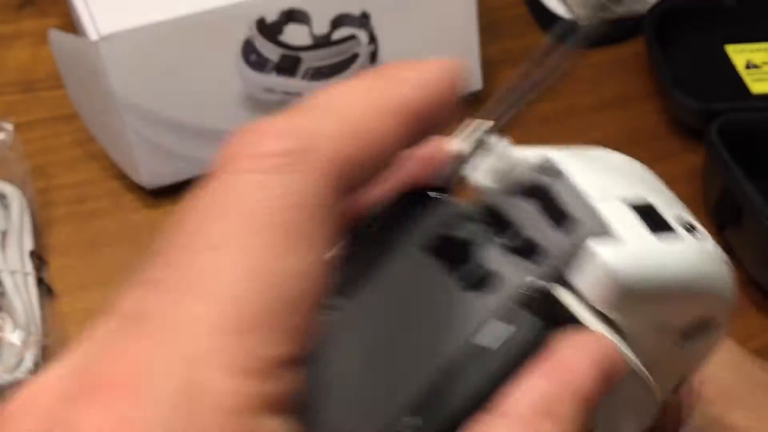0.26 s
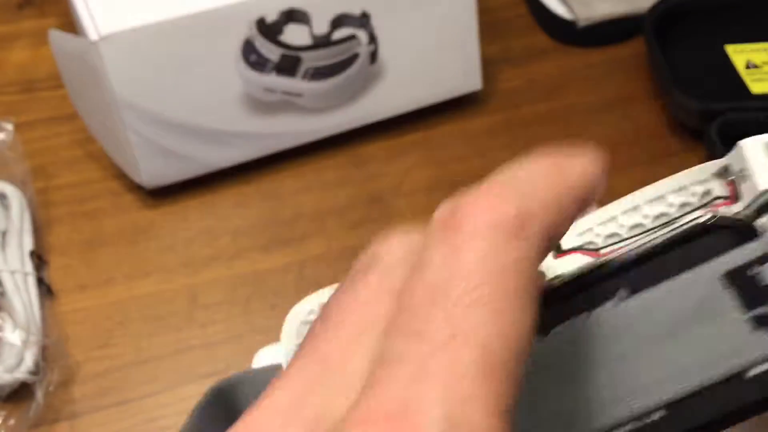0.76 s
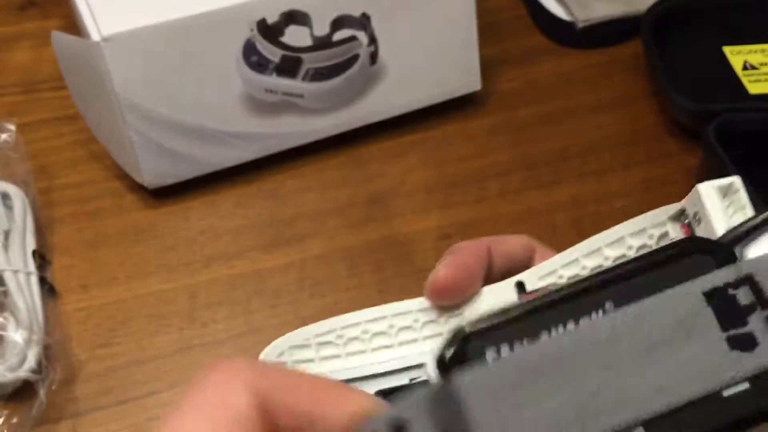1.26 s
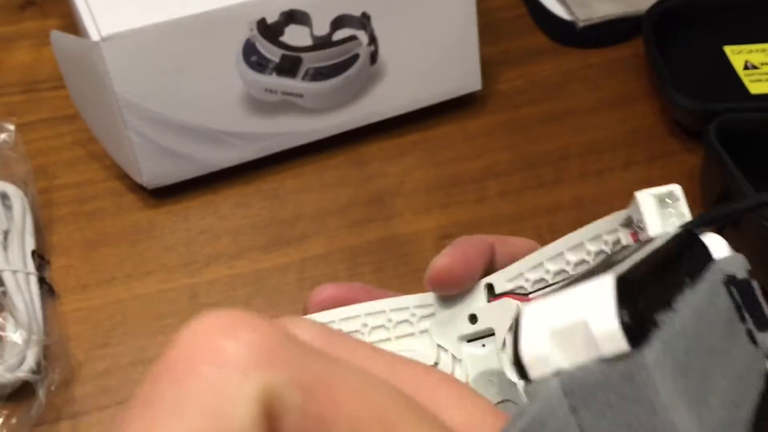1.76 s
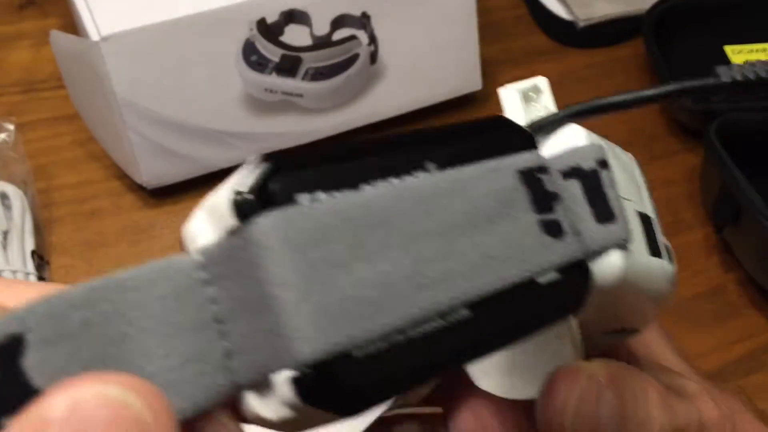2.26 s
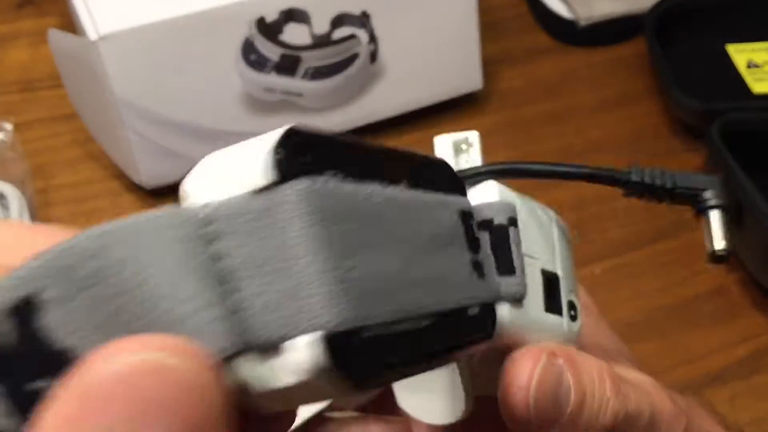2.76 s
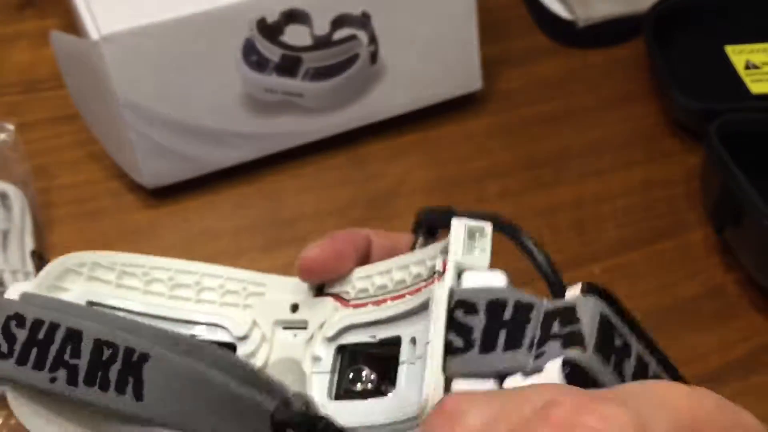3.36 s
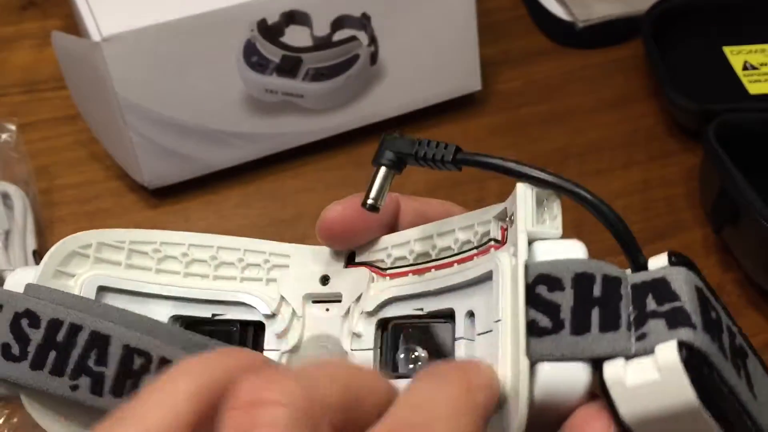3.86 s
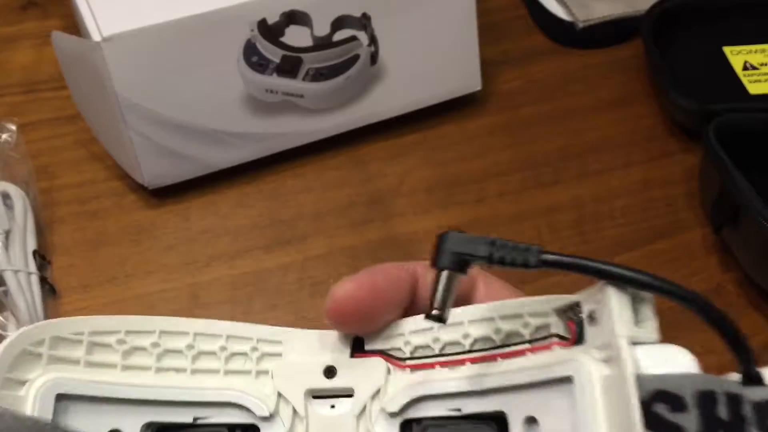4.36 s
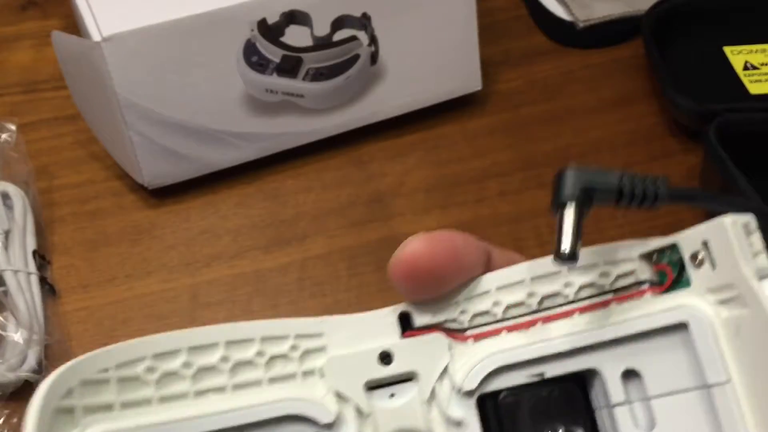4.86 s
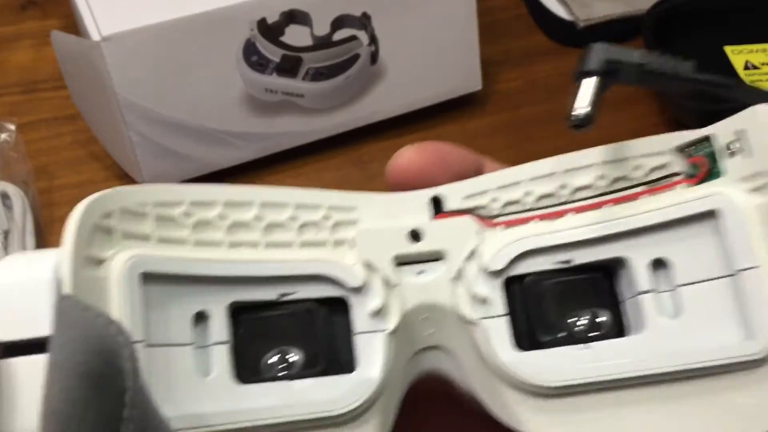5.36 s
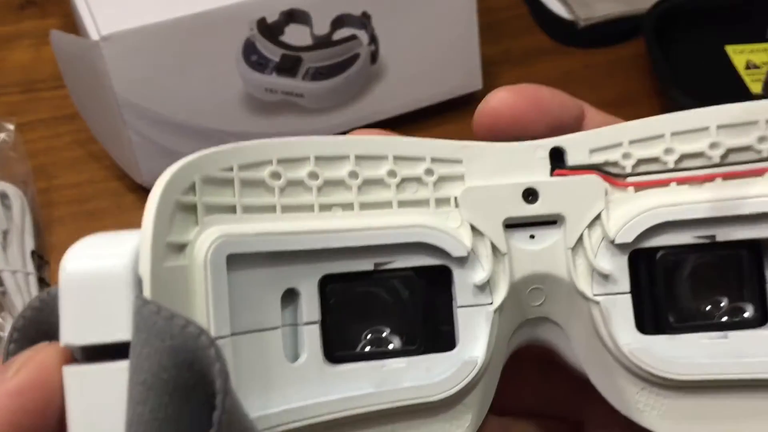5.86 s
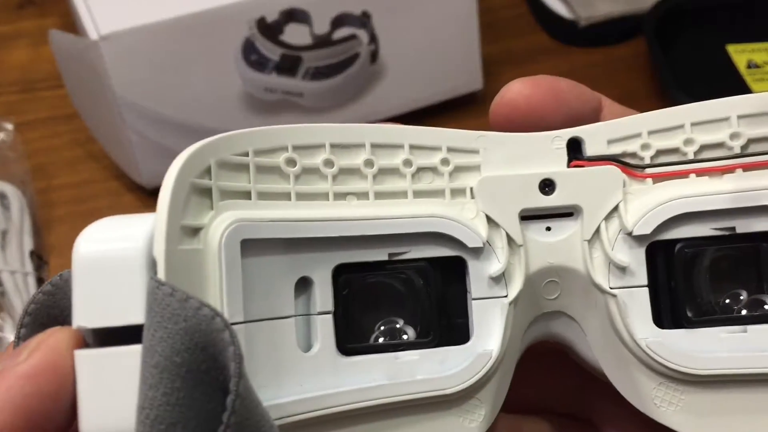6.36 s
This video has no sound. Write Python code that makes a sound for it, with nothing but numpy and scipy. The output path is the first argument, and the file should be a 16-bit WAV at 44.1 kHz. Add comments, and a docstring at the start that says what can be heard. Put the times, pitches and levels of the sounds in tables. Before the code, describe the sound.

Plastic goggles are turned over in the hands, with soft rubbing, light ticks and one sharp snap and clatter halfway through.

```python
"""Plastic video goggles are turned over in the hands above a table in a small, quiet room.
First, fingers and the elastic strap rub on the hollow shell, loose parts tick and hands bump it softly.
Halfway, near 3 s, the rim snaps and the battery pack swings on its strap and clatters against the shell.
Then the rubbing goes on, with more ticks and dull knocks, and dies down before 6 s.
At the end only the resting hands and the low rumble of the room's ventilation remain."""
import sys
import numpy as np
from scipy import signal
from scipy.fft import rfft, irfft
from scipy.io import wavfile
from scipy.ndimage import uniform_filter1d, map_coordinates

SR = 44100
rng = np.random.default_rng(int(sys.argv[2]) if len(sys.argv) > 2 else 0)


def output_pcm(signal):
    """Save a mono or channel-first signal as 16-bit PCM at the path in sys.argv[1].

    Samples are clipped to [-1, 1] before scaling.
    """
    pcm = np.clip(np.atleast_2d(signal).T, -1, 1) * 32767
    wavfile.write(sys.argv[1], SR, np.round(pcm).astype(np.int16))


N = 291942
TIME = np.arange(N) / SR
RING_TIME = TIME[:SR // 8]  # the time one blow is given to ring out

# strokes of skin or strap: peak t/s, length/s, voice level/dB, hiss/dB and hollow/dB relative to the voice
STROKES = [(.005, 0.19, -60.5, -8.5, -24), (0.103, 0.11, -64.5, -0.5, -16), (.182, 0.054, -64, -12, -25),
           (0.388, .05, -61, -11.5, -27), (0.456, 0.067, -58.5, -13, -22), (0.664, 0.11, -66, -5, -21),
           (0.809, 0.16, -63, -7.5, -14), (0.882, .08, -65, 5, -17), (1.012, 0.093, -59.5, -3.5, -11),
           (1.218, 0.088, -61.5, -7.5, -7), (1.304, 0.13, -63, -5.5, -18), (1.412, 0.085, -64.5, -7, -9.5),
           (1.516, 0.077, -62.5, 0, -14), (1.581, .08, -65.5, -7, -25), (1.84, 0.81, -79, -6, -21),
           (2.701, 0.051, -60, -14, -28), (2.742, 0.049, -60.5, 0, -21), (2.908, 0.047, -64.5, 2, -7),
           (2.957, 0.082, -60.5, -10.5, -3), (3.103, 0.16, -52, -3, -13), (3.167, 0.045, -48.5, -3, -11.5),
           (3.27, 0.089, -49.5, -8, -9.5), (3.386, 0.13, -43.5, -8, -38), (3.479, 0.053, -47.5, -16, -26),
           (3.965, 0.047, -59.5, -1, -20), (4, .022, -53.5, 0.5, -12), (4.27, 0.044, -64.5, -5, -14),
           (4.366, 0.11, -67, -2.5, -25), (4.481, 0.027, -57.5, -4, -31), (4.51, 0.027, -56.5, 4.5, -32),
           (4.553, 0.072, -56, -5.5, -28), (4.628, 0.062, -49.5, -6.5, -25), (4.726, 0.072, -50.5, 1, -7),
           (4.859, 0.039, -56, -2.5, -5), (4.96, .16, -68.5, 3, -20), (5.024, 0.034, -57.5, 2.5, -20),
           (5.088, 0.02, -61, 8.5, -11), (5.13, 0.053, -65, 6.5, -20), (5.255, 0.14, -66.5, -1.5, -11),
           (5.42, 0.097, -68.5, 7, -15.5), (5.531, 0.089, -64.5, 8.5, -17.5), (5.573, .07, -60.5, -6, -26)]
# tone colours of rubbing (the shell's voice, the contact's hiss, the hollow inside): f/Hz, relative level/dB
VOICE_SPECTRUM = [(350, -32.5), (800, -18), (1150, -3), (2300, 2.5), (3800, -2), (4600, -5), (6000, -24.5)]
HISS_SPECTRUM = [(1800, -24), (4000, -8), (5600, 2.5), (7000, -0.5), (9000, -2), (12500, -2.5), (15500, -9)]
HOLLOW_SPECTRUM = [(150, -21.5), (300, -2.5), (450, -4), (650, 1.5), (900, 2.5), (1200, -3.5), (2200, -25)]
# each grip leaves three shell resonances free, strongest first: start t/s, f/Hz, f/Hz, f/Hz
GRIPS = [(0, 1220, 3450, 4130), (.05, 1440, 1700, 6330), (.32, 3350, 2397, 3420), (.7, 2050, 4700, 5800),
         (.95, 2230, 3300, 5650), (1.15, 1350, 3230, 3900), (1.46, 1230, 3740, 6300),
         (2.6, 3400, 1300, 5750), (2.86, 1150, 3060, 4003), (3.38, 1750, 2423, 3990),
         (3.85, 1150, 2870, 5390), (4.15, 2195, 1761, 1228), (4.68, 5800, 2238, 8620),
         (4.8, 6900, 1286, 2819), (4.98, 2300, 1430, 5680), (5.3, 3057, 6330, 3830)]
# a fingertip catches: middle t/s, level/dB, length/s, slip rate/(1/s), ringing centre f/Hz
RASPS = [(0.861, -57, 0.031, 900, 4570), (1.017, -62, 0.042, 620, 2230), (2.733, -63, 0.068, 680, 3400),
         (3.99, -63, 0.059, 440, 2810), (4.629, -54.5, 0.046, 860, 1780), (4.729, -52.5, 0.072, 550, 2390),
         (5.027, -60, 0.036, 700, 1450)]

# A mode is a pitch at which a thing rings; the wider it is, the sooner it dies.
# modes of the shell, its rim, the battery pack and the whole body: f/Hz, width/Hz, relative level/dB
SHELL_MODES = [(1226, 130, -2.5), (1580, 160, -7), (1808, 260, -2.5), (2116, 170, -2.5), (2520, 250, -2),
               (2980, 220, -7), (3370, 250, -2.5), (3840, 250, -2), (4500, 340, -2.5), (5400, 300, -5.5),
               (6300, 350, -9)]
RIM_MODES = [(1170, 60, -28), (2120, 180, -13.5), (2450, 150, -7.5), (2790, 240, -17), (3460, 150, 1.5),
             (3480, 450, -8.5), (4000, 360, -10.5), (4590, 600, -13.5), (5253, 210, -17),
             (7024, 450, -19.5), (8800, 500, -13.5), (9100, 440, -16.5)]
PACK_MODES = [(1040, 74, -15.5), (1567, 90, -13), (1750, 110, -4), (2125, 130, -3), (2400, 180, -0.5),
              (2680, 220, 1.5), (3280, 200, -2.5), (3723, 200, 1.5), (4370, 290, 2), (5700, 330, 5),
              (6150, 410, 2), (6650, 270, 1.5), (7140, 280, 0.5), (8415, 350, -2.5), (9000, 280, 1),
              (10400, 500, -10.5), (12400, 600, -9), (13200, 600, -8.5), (15280, 470, -7)]
BODY_MODES = [(378, 71, -7.5), (608, 41, -8.5), (738, 65, -3), (1060, 58, -1.5), (1210, 100, 5.5),
              (1340, 230, -7.5), (1550, 180, -6.5), (1951, 150, -8)]
# Tilt is brightness: above zero a blow has more treble, below zero less.
# impacts of rim and pack: t/s, level/dB, tilt/(dB per octave), gap to first rebound/s, number of blows
RIM_SNAPS = [(3.0485, -36, -1, .017, 2), (3.1373, -36, -1, .016, 2), (3.2048, -37, 0, 0, 1),
             (3.2201, -10.5, 0, .0102, 4), (3.2382, -24, -1, .0043, 2), (5.2704, -48.5, 0, 0, 1)]
PACK_CLACKS = [(3.2984, -26, .5, 0, 1), (3.3018, -20.5, 0, .008, 2), (3.3497, -9.5, 1.4, .0022, 2),
               (3.3631, -16.5, -1, 0, 1), (3.3955, -22.5, -2.5, .052, 4), (3.3976, -24, -6, 0, 1),
               (3.8677, -58, 0, 0, 1), (3.8995, -56, 1, 0, 1)]
# ticks on the shell: t/s, level/dB, tilt/(dB per octave), ringing centre f/Hz
SHELL_TICKS = [(.0414, -33, 5, 4940), (0.0419, -42.5, 0.5, 1200), (0.6643, -37, -1.5, 3840),
               (0.6672, -47, 3, 1560), (1.2059, -49, -2.5, 3480), (1.409, -52.5, 7, 3500),
               (1.502, -49.5, -3, 1300), (2.6705, -54.5, -6, 1400), (2.6916, -48, -13, 2220),
               (3.0173, -48.5, -14, 1200), (3.1712, -35.5, -3, 3503), (3.9798, -45, 7, 5300),
               (4.763, -42, -6, 2520), (4.8556, -31.5, -1.5, 2760), (5.081, -45, 8, 6000)]
# dull knocks: t/s, level/dB, tilt/(dB per octave), damping by the hand (multiplies mode width)
BODY_KNOCKS = [(1.021, -63, -6, 1.1), (1.226, -60.5, -20, 0.65), (2.9074, -36.5, -1, 0.82),
               (2.9135, -41.5, -1, 1.1), (3.173, -43.5, -3.5, 1.1), (3.3382, -38, 4.5, 1.5),
               (3.6266, -60.5, -4, 0.93), (4.7185, -41.5, -12, 3.2), (4.858, -41.5, 0, 2.6),
               (5.2424, -51, -6, 1.8)]
# soft bumps of the hands: t/s, level/dB, f/Hz, time to fade by 60 dB/s
HAND_BUMPS = [(0.56, -47, 203, 0.047), (3.173, -48, 283, 0.056), (3.2039, -41, 238.9, 0.051),
              (4.549, -49.5, 174.8, 0.096), (4.635, -51.5, 84.5, 0.093), (4.719, -34, 192, 0.026),
              (4.762, -31, 115.7, 0.053), (5.243, -59, 278, 0.087)]

# the room's echo, band by band: f/Hz, time to fade by 60 dB/s, level/dB
ECHO_BANDS = [(300, .35, -15), (1000, 0.25, -13.5), (2201, 0.28, -12), (4500, .33, -14),
              (8000, 0.25, -11.5), (14000, .21, -13.5)]
# room air and ventilation: f/Hz, relative level/dB
AIR_SPECTRUM = [(25, -22.5), (50, -6.5), (70, -5.5), (110, -10), (160, -5.5), (280, -13.5), (460, -20),
                (800, -22), (1500, -23.5), (3000, -26), (5000, -29.5), (8000, -31.5), (11600, -31.5),
                (15800, -37.5)]


def rubbing():
    """Skin and strap slide on the shell, which answers with a broad voice, a hiss and a hollow undertone."""
    voice, hiss, hollow = stroke_swells()
    drag = slips(per_second=4500, spread_db=2.5, smooth=.8)
    drag = drag * undb(1.7 * wander(110))  # the skin catches and lets go many times a second
    f, t, spectra = signal.stft(drag, SR, nperseg=512)
    shell_db = shell_response(f, t)
    # a hissier contact is also brighter above 4 kHz
    hiss_db = np.interp(t, TIME, 20 * np.log10(hiss / voice))
    bright_db = np.log2(np.maximum(f, 4000))[:, None] * (1 + .34 * hiss_db)
    layers = (VOICE_SPECTRUM, 0, voice), (HISS_SPECTRUM, bright_db, hiss), (HOLLOW_SPECTRUM, 0, hollow)
    out = 0
    for spectrum, extra_db, swell in layers:
        gain = undb(spectrum_db(f, spectrum)[:, None] + shell_db + extra_db)
        gain = gain / np.sqrt(np.sum(gain ** 2, axis=0))  # change the colour, not the strength
        out = out + swell * unit(signal.istft(spectra * gain, SR)[1][:N])
    return out


def stroke_swells(rise_share=.48, touch_s=.3):
    """Strength of voice, hiss and hollow over time: each stroke swells and fades within a lighter touch."""
    def power(db, hiss_db, hollow_db):
        return undb([[db], [db + hiss_db], [db + hollow_db]]) ** 2

    total = power(-85, .99, -6) * np.ones(N)  # resting hands never keep quite still
    light_touch = power(-77, -4.5, -14)
    for peak_s, length, *levels in STROKES:
        for span, strength in ((length, power(*levels)), (touch_s, light_touch)):
            near = slice(*np.searchsorted(TIME, [peak_s - 2 * span, peak_s + 2 * span]))
            offset = TIME[near] - peak_s
            away = np.maximum(-offset / rise_share, offset / (1 - rise_share)) / span
            total[:, near] += strength * np.exp(-2 * away ** 1.5)  # a little more pointed than a bell
    return np.sqrt(total)


def slips(per_second, spread_db, smooth):
    """Friction: a hail of tiny slips of uneven size over a smooth drag."""
    size = undb(spread_db * np.minimum(rng.exponential(size=N), 4))
    grains = (rng.random(N) < per_second / SR) * size * rng.standard_normal(N)
    return unit(unit(grains) + smooth * rng.standard_normal(N))


def shell_response(f, t, ripple_hz=280, ripple_s=.04):
    """The shell's boost in dB: three free resonances over many small ones, shifting as fingers slide."""
    grips = np.array(GRIPS)
    free_hz = grips[np.searchsorted(grips[1:, 0], t), 1:].T
    peaks = 0
    for hz, share in zip(free_hz, (1.3, .9, .8)):
        hz = hz * (1 + .015 * np.interp(t, TIME, wander(16)))
        strength = share + .32 * np.interp(t, TIME, wander(22))
        half_width_hz = 130 + .025 * hz
        peaks = np.maximum(peaks, strength / (1 + ((f[:, None] - hz) / half_width_hz) ** 2))
    ripple = random_surface(peaks.shape, (ripple_hz / f[1], ripple_s / t[1]))
    return 7 * peaks + 2.6 * ripple


def clatter():
    """The rim snaps and chatters, then the battery pack lands and bounces."""
    out = np.zeros(N)
    for start, db, tilt in rebounds(RIM_SNAPS):
        add(out, start, strike(RIM_MODES, db, tilt, crack_db=-19.5, crack_s=.006, crack_hz=10000))
    for start, db, tilt in rebounds(PACK_CLACKS):
        add(out, start, strike(PACK_MODES, db, tilt, crack_db=-5.5, crack_s=.0015, crack_hz=11300))
    return out


def rebounds(impacts, gap_ratio=.47, loss_db=7, tilt_loss=1.2):
    """Each bounce comes sooner, weaker and duller than the one before."""
    for start, db, tilt, gap, blows in impacts:
        for k in range(blows):
            yield start, db - k * loss_db, tilt - k * tilt_loss
            start += gap * gap_ratio ** k


def strike(modes, db, tilt, crack_db, crack_s, crack_hz):
    """A blow rings the modes, a little differently each time; countless short modes make a noisy crack."""
    ring = 0
    for hz, width, mode_db in modes:
        louder, detune, phase = rng.uniform(-1, 1, 3)
        gain = undb(mode_db + tilt * np.log2(hz) + 2 * louder)
        ring = ring + gain * mode(hz * (1 + .0047 * detune), width, np.pi * phase)
    crack = rng.standard_normal(len(RING_TIME)) * np.exp(-RING_TIME / crack_s)
    top_hz = np.clip(crack_hz * 2 ** (tilt / 3), 2500, 18000)  # a brighter blow cracks higher
    crack = filtered(crack, 2, [top_hz / 5, top_hz], "band")
    contact = 1 - np.exp(-RING_TIME / .00018)  # builds up in a fraction of a millisecond
    hit = (unit(ring) + undb(crack_db) * unit(crack)) * contact
    # a small object gives off little sound below its lowest mode
    hit = filtered(hit, 3, .95 * modes[0][0], "high")
    return set_level(hit, db, samples=SR // 500)  # the first 2 ms set the level


def ticks():
    """Small parts and fingernails tick lightly on the shell."""
    out = np.zeros(N)
    for start, db, tilt, centre_hz in SHELL_TICKS:
        modes = touched_modes(centre_hz)
        add(out, start, strike(modes, db, tilt, crack_db=-2.5, crack_s=.0029, crack_hz=11000))
    return out


def touched_modes(centre_hz, boost_db=12, octaves=.2):
    """A touch rings the shell most near one pitch, set by where it lands."""
    return [(hz, width, db + boost_db * np.exp(-.5 * (np.log2(hz / centre_hz) / octaves) ** 2))
            for hz, width, db in SHELL_MODES]


def knocks_and_bumps():
    """Fingertips knock on the body, and near 3.34 s the swinging pack thuds on it; the flesh of the hand gives
    low, soft bumps."""
    out = np.zeros(N)
    for start, db, tilt, damping in BODY_KNOCKS:
        modes = [(hz, width * damping, mode_db) for hz, width, mode_db in BODY_MODES]
        add(out, start, strike(modes, db, tilt, crack_db=-16.5, crack_s=.0044, crack_hz=4000))
    soft_push = 1 - np.exp(-RING_TIME / .0022)
    for start, db, hz, fade_s in HAND_BUMPS:
        width_hz = np.log(1000) / (np.pi * fade_s)
        add(out, start, undb(db) * soft_push * mode(hz, width_hz))
    return out


def rasps():
    """A fingertip sticks and slips: a run of uneven little ticks that swells and dies away."""
    out = np.zeros(N)
    for middle, db, length, rate, centre_hz in RASPS:
        gap_chance, size_chance = rng.standard_normal((100, 2)).T
        times = np.cumsum(np.exp(.5 * gap_chance)) / rate
        sizes = undb(2.8 * size_chance) * np.sin(np.pi * np.minimum(times / length, 1))
        samples = int(length * SR)
        pulses = np.bincount((times * SR).astype(int), sizes, samples)[:samples]
        tick = strike(touched_modes(centre_hz), db=0, tilt=0, crack_db=3.5, crack_s=.0007, crack_hz=11000)
        rasp = signal.oaconvolve(pulses, tick)  # one tick for every pulse
        add(out, middle - length / 2, set_level(rasp, db, samples))
    return out


def room_echo(x):
    """The walls of a small room return a blur of echoes; the highest treble dies first."""
    t = TIME[:SR // 2]
    noise_spectrum = rfft(rng.standard_normal(len(t)))
    log_f = np.log(np.maximum(np.fft.rfftfreq(len(t), 1 / SR), 1))
    centres = np.log([row[0] for row in ECHO_BANDS])
    onset = np.clip((t - .003) / .0032, 0, 1)  # the first echoes arrive after 3 ms
    tail = 0
    for share, (_, fade_s, db) in zip(np.eye(len(ECHO_BANDS)), ECHO_BANDS):
        fade = undb(-60 * t / fade_s) * onset
        band = irfft(noise_spectrum * np.interp(log_f, centres, share), len(t))
        tail = tail + undb(db) * band * fade / np.sqrt(np.sum(fade ** 2))
    return signal.oaconvolve(x, tail)[:N]


def room_air(level_db=-69):
    """Air and ventilation: a steady low rumble and faint hiss, with a drone that swells and sinks."""
    drone = signal.oaconvolve(rng.standard_normal(N), mode(hz=178, width_hz=29))[:N]
    drone_db = -76 + 2.4 * wander(1.9)
    colour = undb(spectrum_db(np.fft.rfftfreq(N, 1 / SR), AIR_SPECTRUM))
    air = irfft(rfft(rng.standard_normal(N)) * colour, N)
    return undb(level_db) * unit(air) + undb(drone_db) * unit(drone)


def mode(hz, width_hz, phase=0):
    """One pitch that rings and fades after a blow."""
    return np.sin(2 * np.pi * hz * RING_TIME + phase) * np.exp(-np.pi * width_hz * RING_TIME)


def wander(per_second):
    """A smooth random drift up and down, of typical size 1."""
    hold = int(SR / per_second)
    steps = np.repeat(rng.standard_normal(N // hold + 1), hold)[:N]
    return unit(uniform_filter1d(uniform_filter1d(steps, hold), hold))


def random_surface(shape, steps):
    """Random hills over frequency and time, the given steps apart, of typical size 1."""
    place = np.indices(shape) / np.reshape(steps, (2, 1, 1))
    heights = rng.standard_normal((shape[0] // 2 + 2, shape[1] // 2 + 2))
    return unit(map_coordinates(heights, place, order=1, mode="nearest"))


def spectrum_db(f, points):
    """Level at frequencies f on a curve through points of f/Hz, level/dB."""
    hz, db = np.transpose(points)
    return np.interp(np.log(np.maximum(f, 1)), np.log(hz), db)


def filtered(x, order, hz, kind):
    """Keep the highs or one band of x; a higher order cuts more steeply."""
    return signal.sosfilt(signal.butter(order, hz, kind, fs=SR, output="sos"), x)


def set_level(x, db, samples):
    """Make the first samples of x as strong as a sine wave that peaks at db."""
    return x * undb(db) / np.sqrt(2 * np.mean(x[:samples] ** 2))


def undb(db):
    """Turn decibels into a multiplier."""
    return 10 ** (np.asarray(db) / 20)


def unit(x):
    """Scale to an average strength (rms) of 1."""
    return x / np.sqrt(np.mean(x ** 2))


def add(out, start_s, x):
    """Mix x into out from the given time."""
    i = int(round(start_s * SR))
    out[i:i + len(x)] += x[:N - i]


def scene():
    """All sounds of the goggles, their echo and the room's air, in one channel."""
    goggles = rubbing() + clatter() + ticks() + rasps() + knocks_and_bumps()
    return (goggles + room_echo(goggles) + room_air())[None]


def record(dry):
    """The microphone loses the deep bass and the very top, and has a narrow dip in the treble."""
    bass_hz, dip_hz, dip_depth, top_hz = 48, 10450, .55, 15900
    sound = filtered(dry, 4, bass_hz, "high")
    notched = signal.lfilter(*signal.iirnotch(dip_hz, Q=11, fs=SR), sound)
    sound = sound + dip_depth * (notched - sound)
    return signal.sosfilt(signal.ellip(8, .2, 70, top_hz, fs=SR, output="sos"), sound)


dry = scene()
out = record(dry)
output_pcm(out)
```